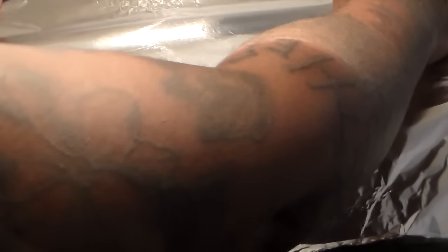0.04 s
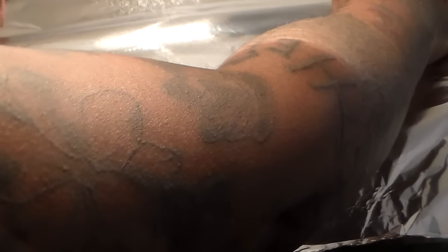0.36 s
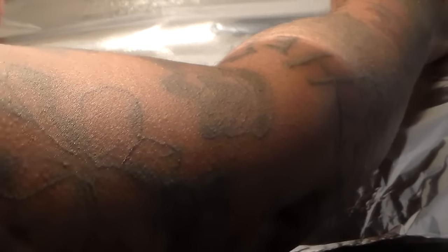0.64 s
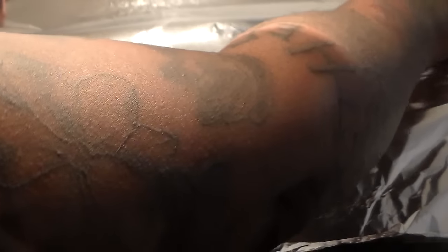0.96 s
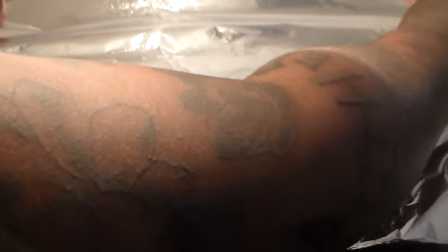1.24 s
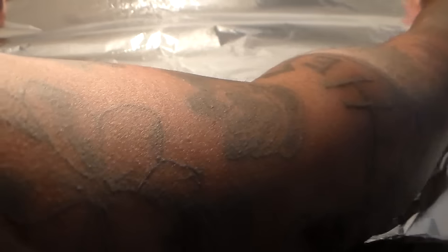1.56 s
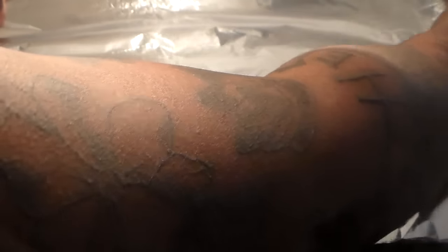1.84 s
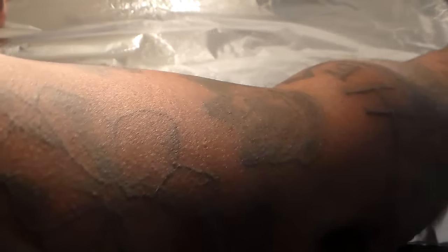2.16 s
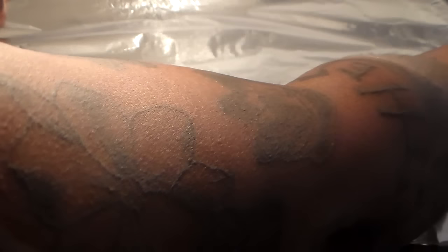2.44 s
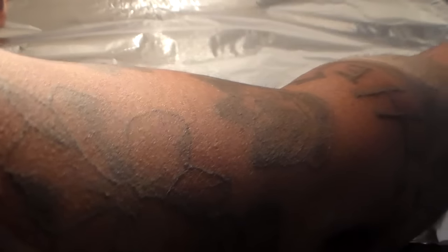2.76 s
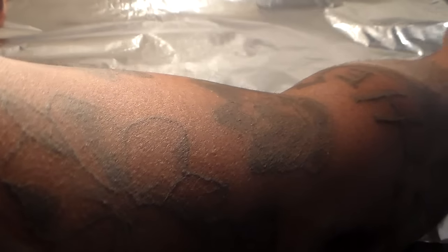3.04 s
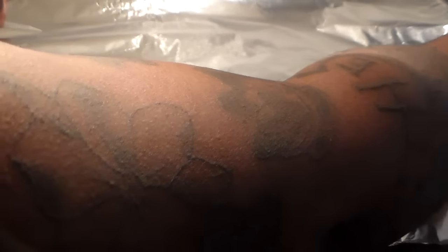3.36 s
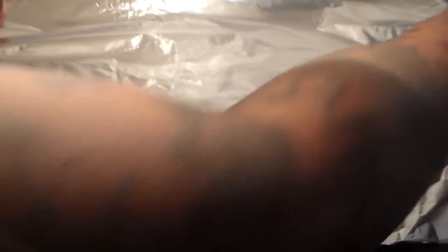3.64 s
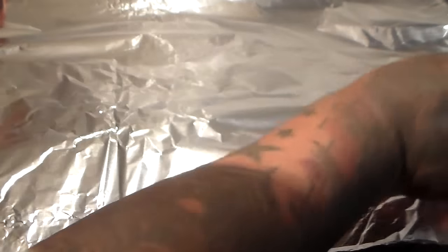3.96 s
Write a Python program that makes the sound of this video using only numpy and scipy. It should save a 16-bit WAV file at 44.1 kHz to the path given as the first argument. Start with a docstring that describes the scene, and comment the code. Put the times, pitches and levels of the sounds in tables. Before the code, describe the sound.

Aluminium foil crinkles close by from the start, in quick, uneven bursts with sharp ticks and small pops as a forearm shifts on it. At about 2.55 seconds the arm softly bumps the table and the foil falls still. Crinkling returns near 2.9 seconds, rests around 3.55, then ends with a few crackles. A machine hums faintly throughout the small, hard room, joined by a low drone near 2.9 seconds.

```python
"""A forearm shifts on aluminium foil, close to the microphones in a small, hard room where a machine hums.
From the start, each shift sets off a burst of tiny crease snaps. Now and then a larger facet (a flat bit
of foil) buckles with a pop, or a fold is crushed. At about 2.55 s the arm bumps the table and the foil
falls still. Near 2.9 s the crinkling returns and a low drone joins the hum. The foil rests again
around 3.55 s, then gives a few last crackles."""
import sys
import numpy as np
from scipy import signal
from scipy.fft import rfft, irfft
from scipy.io import wavfile
from scipy.ndimage import uniform_filter1d

SR = 44100
rng = np.random.default_rng(int(sys.argv[2]) if len(sys.argv) > 2 else 0)


def generate_wav(signal):
    """Clip the signal to [-1, 1] and save it as 16-bit WAV at the path in sys.argv[1]."""
    frames = np.transpose(np.atleast_2d(signal))
    scaled = np.clip(frames, -1, 1) * 32767
    pcm = np.round(scaled).astype(np.int16)
    wavfile.write(sys.argv[1], SR, pcm)


N = 176400  # 4 seconds


# Shifts of the arm. Each row: start in seconds, length in seconds, crackle level in dB, fizz level in dB.
ARM_SHIFTS = [(0.008, 0.021, -3.5, -5), (0.131, 0.03, -4.5, -1), (0.186, 0.0097, 1, 3.5),
              (0.237, 0.0062, 1.5, 1.5), (0.327, 0.011, -2, -5.5), (0.413, 0.075, 4, 0),
              (0.535, 0.028, 4.5, -1), (0.582, 0.017, 7, 5), (0.742, 0.019, 2.5, 0), (0.777, 0.031, 4, 5),
              (0.85, 0.027, 4, 8), (0.908, 0.047, -2, -5.5), (0.988, 0.027, 1.5, -2),
              (1.059, 0.056, 3.5, 0), (1.18, 0.042, 4.5, -1.5), (1.247, 0.053, 3, 2),
              (1.332, 0.019, 2, 3.5), (1.403, 0.0082, 5, 5), (1.427, 0.075, 2, 1), (1.526, 0.029, 3.5, 1),
              (1.637, 0.023, 6, 0), (1.668, 0.038, -3, 3.5), (1.74, 0.018, 2, 4.5), (1.828, 0.048, 3.5, 3),
              (1.963, 0.014, 4, 5), (1.978, 0.088, 2.5, -2.5), (2.028, 0.034, -4, 6),
              (2.068, 0.046, -3, 2.5), (2.183, 0.013, 4, 6), (2.225, 0.083, -1.3, -4),
              (2.434, 0.017, 2.5, 3.5), (2.473, 0.076, 1, 1.5), (2.572, 0.021, 4.5, 8.5),
              (2.88, 0.075, -1.5, -11), (3.003, 0.047, 1, 5), (3.096, 0.066, -1.5, 3),
              (3.148, 0.14, -6, -4.5), (3.31, 0.017, 4.5, 0.5), (3.343, 0.027, 3, 0.5),
              (3.39, 0.071, -1, -7), (3.457, 0.026, 6, 6), (3.624, 0.027, -2, -2.5), (3.699, 0.013, -6, 3),
              (3.733, 0.012, 4, 1)]
# Times when the arm lightly touches the foil. Each row: start in seconds, end in seconds.
LIGHT_TOUCHES = [(0, 2.61), (2.89, 3.4), (3.64, 3.77)]

def arm_pressure(t):
    """Shifts add to a light touch. Gives the strength of the lower crackle and of the higher fizz."""
    touching = sum(uniform_filter1d(1. * ((t > a) & (t < b)), SR // 40) for a, b in LIGHT_TOUCHES)
    crackle_power = fizz_power = touching.clip(0) * amp(-12) ** 2
    for start, length, crackle_db, fizz_db in ARM_SHIFTS:
        shift = push(t, start, length)
        crackle_power = crackle_power + (shift * amp(crackle_db)) ** 2
        fizz_power = fizz_power + (shift * amp(fizz_db)) ** 2
    return np.sqrt(crackle_power), np.sqrt(fizz_power)


def push(t, start, length, release_s=.015):
    """One push of the arm rises, holds and lets go."""
    out = np.zeros(N)
    during = slice(int(start * SR), int((start + .25) * SR))
    age = t[during] - start
    rise = np.clip(age / (.4 * length), 0, 1)
    out[during] = rise * np.exp(-np.maximum(age - length, 0) / release_s)
    return out


def crease_snaps(crackle, fizz, snaps_per_s=600, bends_per_s=35, crackle_hz=2270, fizz_hz=5760):
    """On one patch of foil, creases snap by the hundred, each with its own size and tone."""
    count = N // 16
    at = (np.cumsum(rng.exponential(size=count)) * SR / snaps_per_s).astype(int)
    size = amp(2 * np.minimum(rng.exponential(size=count), 4)) * (at < N)
    at = np.minimum(at, N - 1)
    out = 0
    for hz, band in half_octave_bands():
        fizz_share = np.clip(np.log(hz / crackle_hz) / np.log(fizz_hz / crackle_hz), 0, 1)
        strength = crackle[at] ** (1 - fizz_share) * fizz[at] ** fizz_share
        # the pitches at which the patch rings shift as it bends
        bend_db = 2 * np.interp(at * bends_per_s / SR, np.arange(count), rng.standard_normal(count))
        own_tone = (1 + .84 * rng.standard_normal(count)) * rng.choice([-1, 1], count)
        snaps = size * own_tone * amp(bend_db) * strength
        out = out + signal.sosfilt(band, np.bincount(at, snaps, N))
    return out


# The tone of the crinkling. Each row: frequency in Hz, relative level in dB.
FOIL_TONE = [(220, -20), (450, -8), (780, -13.5), (1200, -8.5), (1550, -1), (2100, -3), (2550, -.5),
             (3500, 0), (4100, -3.5), (5000, -1.5), (6400, -5.5), (8700, -4), (14000, -16)]

def crinkling_foil(t, patches=5):
    """Several patches of the sheet crinkle, each with its own path to the microphones."""
    crackle, fizz = arm_pressure(t)
    sheet = sum(room(crease_snaps(crackle, fizz)) for _ in range(patches))
    return set_level(colour(sheet, FOIL_TONE), -30)


# Facets that buckle. Each row: start in seconds, relative level in dB, pitch of the ring in Hz.
FACET_POPS = [(.107, -19, 1540), (.153, -19, 1580), (0.342, -19, 2640), (.465, -12, 2740),
              (.679, -14.5, 2470), (0.807, -17, 1490), (1.041, -13, 2380), (1.159, -16.5, 2720),
              (1.214, -14.5, 1560), (1.403, -17, 2360), (2.164, -18, 1660), (3.35, -18.5, 1290),
              (3.64, -21, 1500)]

def facet_pops(t, ring_s=.02):
    """A larger facet flips with a crack and rings briefly on three nearby pitches."""
    out = np.zeros(N)
    crack = signal.sosfilt(bandpass(1, 900, 5000), rng.standard_normal(N))
    for start, db, hz in FACET_POPS:
        age = np.maximum(t - start, 0)
        pitches = hz * (1 + .066 * rng.standard_normal(3))
        ring = sum(np.sin(2 * np.pi * pitch * age) for pitch in pitches) / 3
        fade = (age > 0) * amp(-60 * np.minimum(age / ring_s, 2))
        out += amp(db - .5) * fade * (ring + .59 * crack)
    return out


# Creases that snap alone. Each row: start in seconds, relative level in dB.
LONE_SNAPS = [(0.02, -30), (0.3962, -23.5), (0.7122, -22.5), (1.041, -21), (1.2145, -20.5), (1.4144, -22),
              (1.706, -17.5), (1.9694, -32.5), (2.3424, -22.5), (3.018, -20.5)]

def lone_snaps(t, fade_s=.0045):
    """A single crease snaps with a sharp, bright tick."""
    out = np.zeros(N)
    hiss = signal.sosfilt(bandpass(1, 3000, 11000), rng.standard_normal(N))
    for start, db in LONE_SNAPS:
        fade = (t > start) * np.exp(-np.minimum(abs(t - start) / fade_s, 20))
        out += amp(db + 6) * fade * hiss
    return out


# Folds being crushed. Each row: start in seconds, length in seconds, level in dB.
CRUSHED_FOLDS = [(0.58, 0.011, -41), (0.672, 0.0084, -40.5), (0.847, 0.019, -40), (1.208, 0.0082, -38),
                 (1.66, 0.03, -43.5), (1.816, 0.05, -39), (3.468, 0.023, -44.5)]

def crushed_folds(t, snaps_per_s=3000):
    """Folds give way under the weight of the arm in a soft rush of dull, uneven snaps."""
    snaps = rng.standard_normal(N) * (rng.random(N) < snaps_per_s / SR)
    dull = set_level(signal.sosfilt(bandpass(2, 352, 1130), snaps), 0)
    return dull * sum(amp(db) * push(t, start, length) for start, length, db in CRUSHED_FOLDS)


def table_bump(t, start_s=2.553, rise_s=.012, hz=110):
    """The arm bumps the table with a soft, short thud."""
    age = np.maximum(t - start_s, 0)
    swell = age / rise_s * np.exp(1 - age / rise_s)
    return amp(-35.5) * swell * np.sin(2 * np.pi * hz * age)


def room(sound, scatter_s=.0077, echo_s=.5):
    """Sound reaches two microphones directly, off the arm and table, and as the room's echo."""
    t = np.arange(SR // 2) / SR
    freqs = np.fft.rfftfreq(len(t), 1 / SR)
    scatter = unit_energy(rng.standard_normal((2, len(t))) * np.exp(-t / scatter_s))
    echo = 0
    for hz, band in half_octave_bands():
        fade_s = echo_s * (hz / 2000) ** -.3  # high sounds die sooner
        echo = echo + signal.sosfilt(band, rng.standard_normal((2, len(t)))) * amp(-60 * t / fade_s)
    echo = unit_energy(echo * np.clip(t / .0031, 0, 1))
    left, right = rfft(amp(3) * scatter + amp(2.5) * echo)
    # the microphones are close together, so they share the low echoes; the 1 is the direct sound
    right = 1 + blend(right, left, likeness=1 / (1 + (freqs / 2000) ** 2))
    left_lag_s = 55e-6 + 15e-6 * rng.standard_normal()
    left = (1 + left) * np.exp(-2j * np.pi * freqs * left_lag_s)
    # the treble around 7 kHz is blended between left and right, so it sounds narrower
    centred_band = np.exp(-(np.log2((freqs + 1) / 7130) / .57) ** 10)
    left = blend(left, right, likeness=.57 * centred_band)
    lead = SR // 1000  # a little space ahead of the direct sound keeps it whole
    paths = unit_energy(np.roll(irfft([left, right]), lead, axis=1))
    return signal.fftconvolve(sound[None], paths, axes=1)[:, lead:lead + N]


# The machine's tones. Each row: pitch in Hz, relative level in dB.
HUM_TONES = [(118.5, -59.5), (250, -59), (270.8, -58.5), (353, -53.5), (411.9, -48), (470, -63)]

def machine_hum(t, drone_hz=69.2, drone_start_s=2.91):
    """A machine hums on a few steady tones; later a low drone fades in."""
    def tone(hz, db):
        return np.sqrt(2) * amp(db) * np.sin(2 * np.pi * (hz * t + rng.random()))
    hum = sum(tone(hz, db) for hz, db in HUM_TONES)
    return hum + tone(drone_hz, -51.5) * np.clip((t - drone_start_s) / .26, 0, 1)


# The tone of the room's air. Each row: frequency in Hz, relative level in dB.
AIR_TONE = [(35, 1.5), (110, -9), (300, -6.5), (480, -6), (800, -15.5), (14000, -34.5)]

def air_rush(width=.31):
    """Air makes a low, soft rush, slightly different on the left and right."""
    middle, side = set_level(colour(rng.standard_normal((2, N)), AIR_TONE), -45)
    return middle + width * side * np.array([[1], [-1]])


# How loud the background is. Each row: time in seconds, level change in dB.
BACKGROUND_LEVEL = [(2.6, -1.5), (2.75, -3), (3.6, 1)]

def background(t):
    """The hum and the air dip briefly together, then grow a little louder."""
    times, db = np.array(BACKGROUND_LEVEL).T
    return (machine_hum(t) + air_rush()) * amp(np.interp(t, times, db))


def amp(db):
    """Turn decibels into a number to multiply by."""
    return 10 ** (np.asarray(db) / 20)


def set_level(sound, db):
    """Scale a sound to an average (rms) level in dB."""
    return sound * amp(db) / np.sqrt(np.mean(sound ** 2))


def unit_energy(pair):
    """Scale each side so that its energy is 1."""
    return pair / np.sqrt(np.sum(pair ** 2, axis=1, keepdims=True))


def blend(own, other, likeness):
    """Make one side more like the other: 0 leaves it alone, 1 copies the other."""
    return likeness * other + np.sqrt(1 - likeness ** 2) * own


def bandpass(order, low_hz, high_hz):
    """A filter that keeps what lies between two frequencies."""
    return signal.butter(order, [low_hz, high_hz], "band", fs=SR, output="sos")


def half_octave_bands():
    """Thirteen bands from low to high, each as its middle in Hz and its filter."""
    return [(hz, bandpass(2, hz / 2 ** .25, hz * 2 ** .25)) for hz in 250 * 2 ** (np.arange(13) / 2)]


def colour(sound, table):
    """Turn frequencies up or down, following rows of Hz and dB."""
    hz, db = np.array(table).T
    freqs = np.fft.rfftfreq(2 * N, 1 / SR)
    gain = amp(np.interp(np.log(freqs + 1), np.log(hz), db))
    return irfft(rfft(sound, 2 * N) * gain)[..., :N]


def scene(room_share=.8):
    """The foil and the bump on the table, over the hum and the air."""
    t = np.arange(N) / SR
    foil = crinkling_foil(t)
    pops = facet_pops(t) + lone_snaps(t)
    pops = room_share * room(pops) + (1 - room_share) * pops  # they are close, so part skips the room
    return foil + pops + room(crushed_folds(t)) + table_bump(t) + background(t)


# The balance of the two microphones. Each row: frequency in Hz, left level minus right level in dB.
MIC_BALANCE = [(400, 1.6), (1300, -1), (2400, 2), (3800, 4), (5500, -.5), (8500, -1.5), (11000, -8),
               (13500, -11.5)]

def record(dry, top_hz=14300):
    """The right microphone hears more of the high treble than the left; the very top is cut."""
    left = colour(dry[0], [(hz, db / 2) for hz, db in MIC_BALANCE])
    right = colour(dry[1], [(hz, -db / 2) for hz, db in MIC_BALANCE])
    return signal.sosfilt(signal.ellip(12, .1, 80, top_hz, fs=SR, output="sos"), [left, right])


dry = scene()
out = record(dry)
generate_wav(out)
```